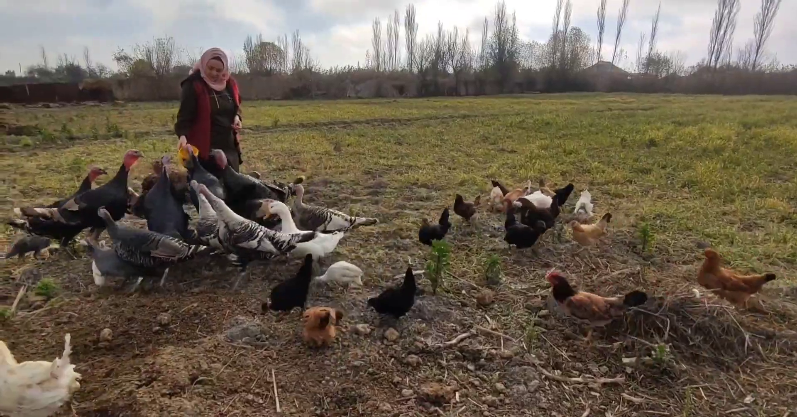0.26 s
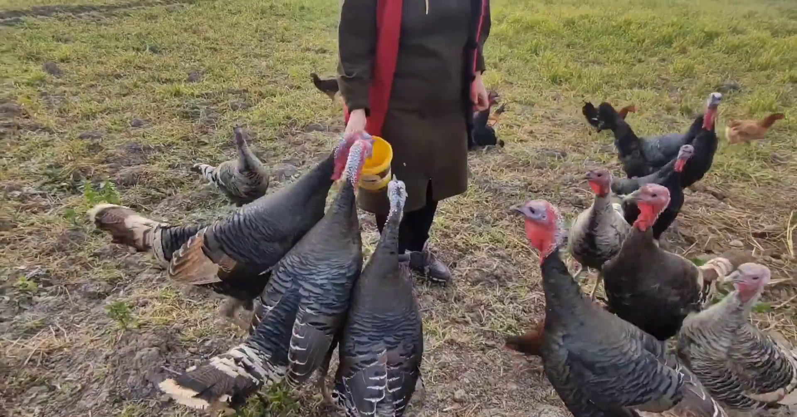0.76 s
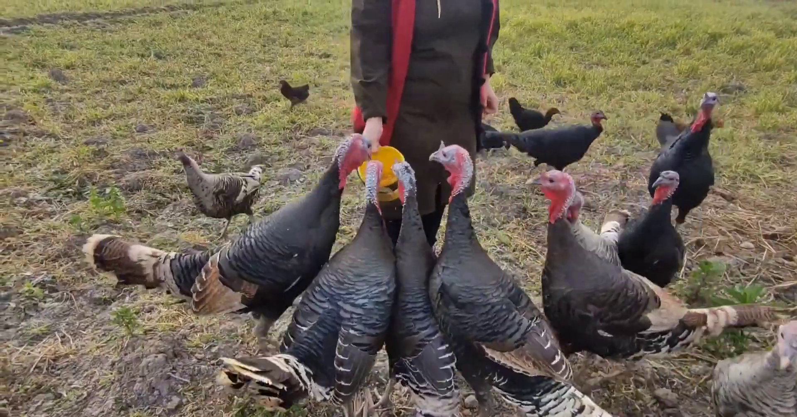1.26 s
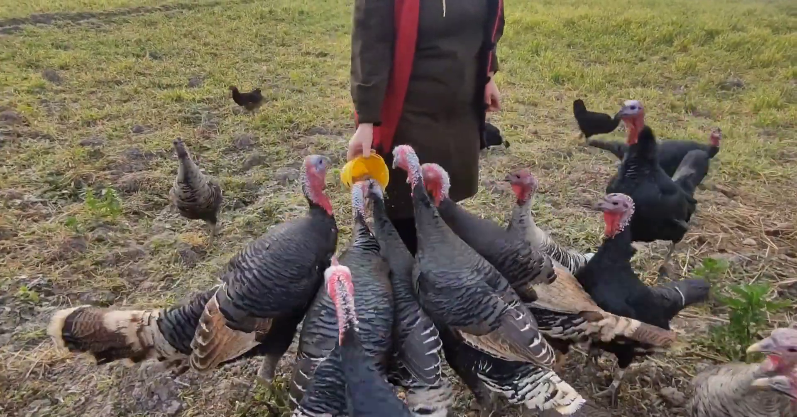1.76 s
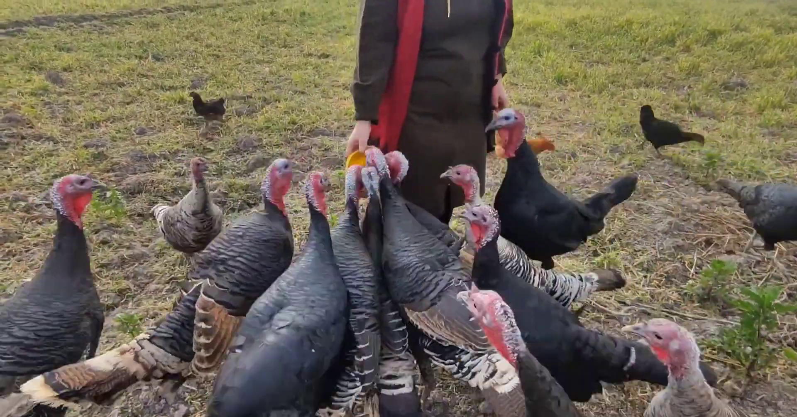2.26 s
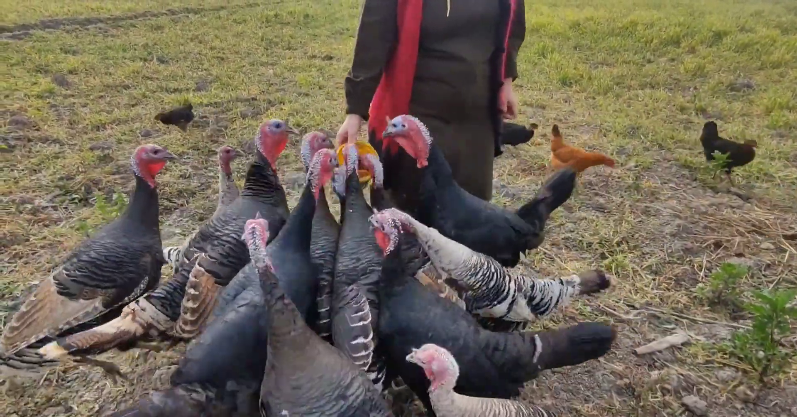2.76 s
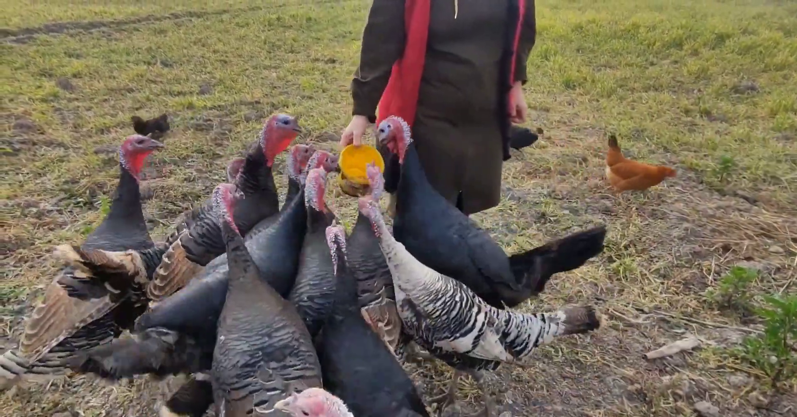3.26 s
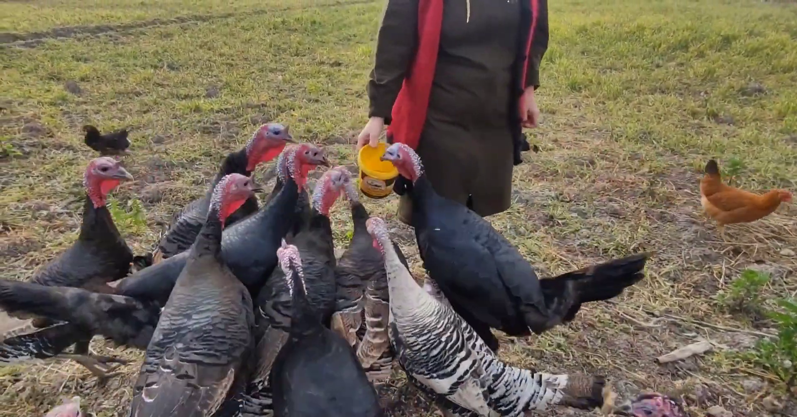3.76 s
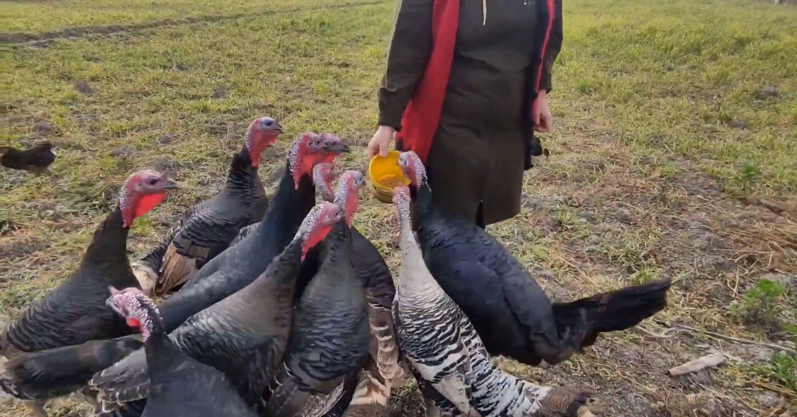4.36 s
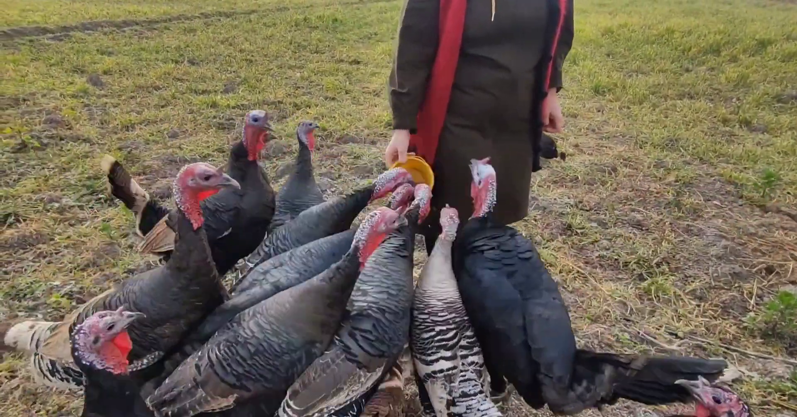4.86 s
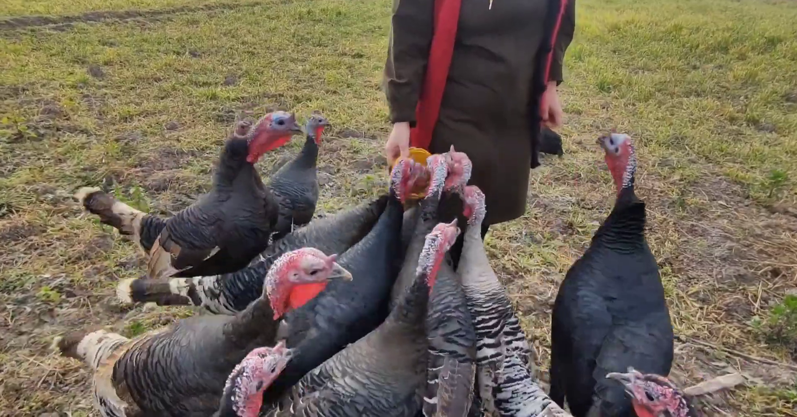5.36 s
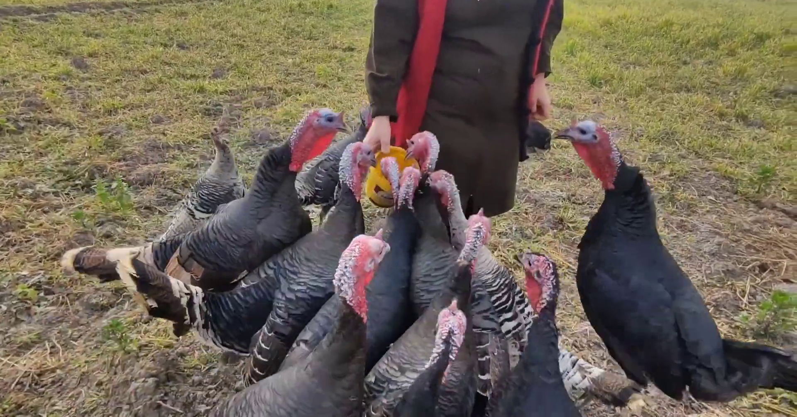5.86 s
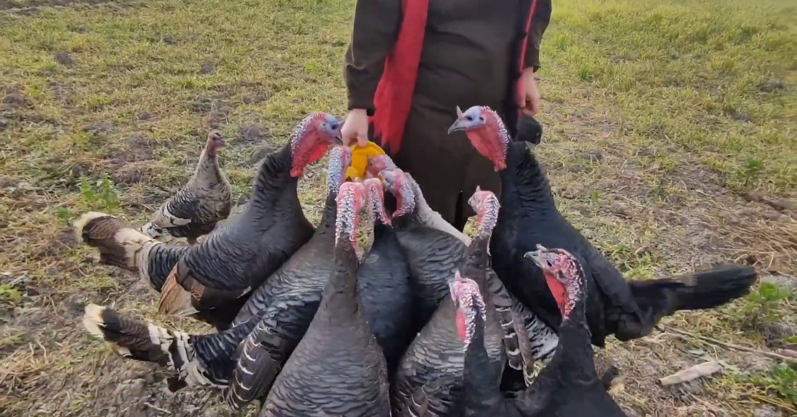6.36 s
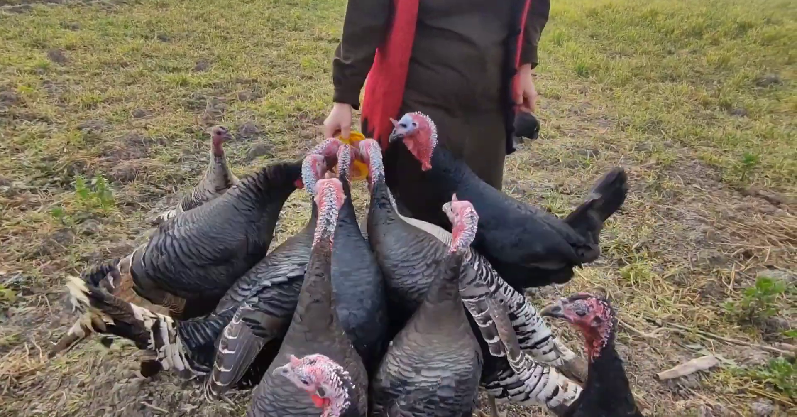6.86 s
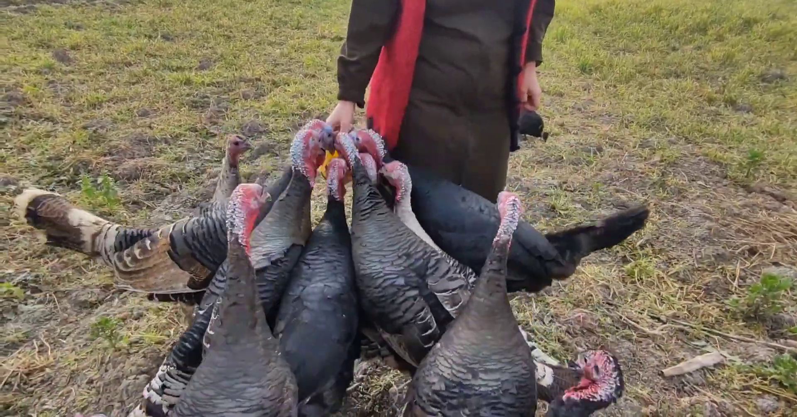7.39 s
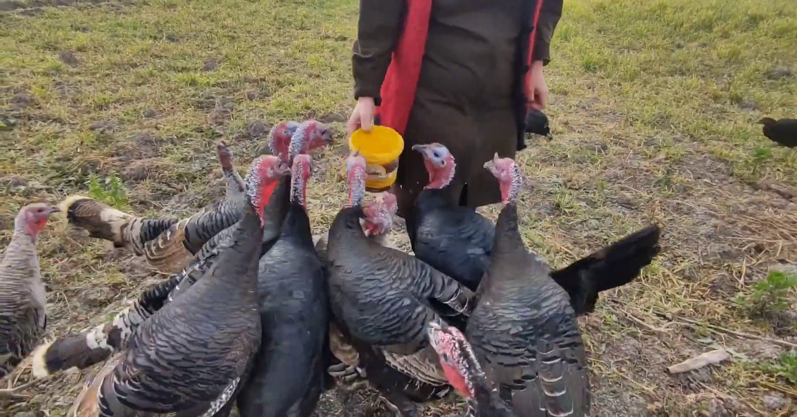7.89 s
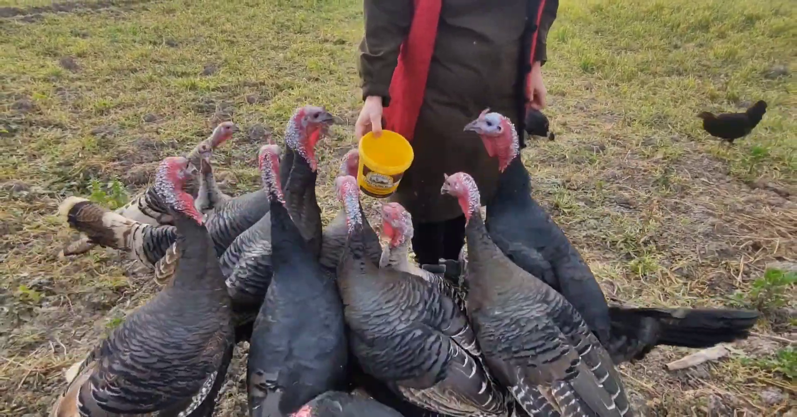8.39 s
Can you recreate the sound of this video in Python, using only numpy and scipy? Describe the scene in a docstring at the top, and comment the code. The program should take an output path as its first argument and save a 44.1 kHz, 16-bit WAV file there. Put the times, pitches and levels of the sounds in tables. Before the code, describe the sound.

A crowd of turkeys gobbles, whines and cries close by while dry straw rustles and small ticks snap on an open field.

```python
"""Young turkeys round a feed tub

A flock crowds round a tub on a stubble field, close to the microphone. The birds call over one another:
gliding tones with throat-shaped overtones make long whines, quick gobbling yelps, honks, cries and pips;
pulses and gated noise ringing a throat make harsh clucks. Coloured noise and tiny cracks are dry straw,
low noise bursts are feet, short ringing ticks are beaks and stalks. Behind lie a light breeze and a drone."""
import sys
import numpy as np
from scipy import signal
from scipy.fft import rfft, irfft, next_fast_len
from scipy.io import wavfile
from scipy.ndimage import uniform_filter1d, map_coordinates

SR = 44100
rng = np.random.default_rng(int(sys.argv[2]) if len(sys.argv) > 2 else 0)


def dump(signal):
    """Clip the signal to [-1, 1] and save it as 16-bit WAV at the path in sys.argv[1]."""
    limited = np.clip(np.atleast_2d(signal).T, -1, 1)
    pcm = np.round(limited * 32767).astype(np.int16)
    wavfile.write(sys.argv[1], SR, pcm)


N = 380583

# Glides of a yelp and of a cry, at even steps from start to end: (pitch over the call's own pitch [ratio])
YELP_GLIDE = [0.96, .93, .94, 1.0, 1.12, 1.333]
CRY_GLIDE = [0.63, .94, 0.97, .92, .82, .74, .67, .5]
FAR_HZ = 1223  # middle pitch of the birds further back


def amp(db):
    """Decibels to a linear gain."""
    return 10 ** (np.asarray(db) / 20)


def unit(x):
    """x at rms 1."""
    return x / np.sqrt(np.mean(x ** 2) + 1e-20)


def along(points, hz):
    """Read a curve of (frequency [Hz], value) points on a log frequency axis."""
    f, v = np.transpose(points)
    return np.interp(np.log(hz + 1), np.log(f), v)


def wobble(rate, size):
    """A smooth random curve over size samples, with rate knots a second."""
    knots = rng.standard_normal(int(size * rate / SR) + 4)
    return map_coordinates(knots, [1 + np.arange(size) * rate / SR])


def filtered(x, response):
    """x times a response of frequency."""
    n = x.shape[-1]
    m = next_fast_len(n + 4096)
    return irfft(rfft(x, m) * response(np.fft.rfftfreq(m, 1 / SR)), m)[..., :n]


def coloured(x, spectrum):
    """x given a spectrum, at rms 1."""
    return unit(filtered(x, lambda hz: amp(along(spectrum, hz))))


def diffuse(pair, spectrum):
    """Two unrelated signals as a stereo pair with a spectrum, at rms 1."""
    # Diffuse sound differs between the ears as it rises in pitch: (frequency [Hz], side level [dB])
    width = [(120, -27), (700, 0), (3000, -0.5)]
    side = filtered(pair[1], lambda hz: amp(along(width, hz)))
    return coloured(pair[0] + np.array([side, -side]), spectrum)


def add(track, s, sound):
    """Mix a sound in at time s."""
    part = track[:, max(round(s * SR), 0):][:, :sound.shape[-1]]
    part += sound[..., :part.shape[-1]]


def swell(n, place, bend):
    """A rounded rise and fall over n samples, loudest at place (0-1)."""
    arc = np.interp(np.linspace(0, 1, n), [0, place, 1], [0, .5, 1])
    return np.abs(np.sin(np.pi * arc)) ** bend


def near_birds(flock_db=-18):
    """The near birds call; others further back join in at their own moments and pitches."""
    # Where the callers stand: (time [s], left ear's lead [ms])
    places = [(.55, -0.38), (1.04, 0.38), (1.4, 0.31), (1.87, -0.23), (2, .24), (2.15, 0.13), (2.95, -.15),
              (3.75, -0.26), (4.45, 0.028), (5.1, -0.075), (5.7, 0.15), (6.85, -0.0097), (7.2, -0.18),
              (8.4, -0.13)]
    out = np.zeros((2, N))
    times, leads = np.transpose(places)
    for s, length, pitch, db, overtone_db in calls():
        add(out, s, note(length, pitch, db, overtone_db, np.interp(s, times, leads)))
        # seconds, octaves and milliseconds
        late, higher, lead_ms = rng.uniform(-1, 1, 3) * [.035, .6, .4]
        far_pitch = FAR_HZ * 2 ** higher * pitch / pitch.mean()
        add(out, s + late, note(length, far_pitch, flock_db + db, overtone_db, lead_ms))
    return out


def calls():
    """Every note of the near birds: (time [s], length [s], glide [Hz], level [dB], overtone level [dB])."""
    # Overtone levels are relative to the fundamental, before the throat shapes them.
    # Yelps, mostly in the quick runs of a gobble:
    # (time [s], length [s], pitch [Hz], level [dB], overtone level [dB])
    yelp_table = [(0.473, 0.029, 1054, -24.5, 3), (0.53, 0.026, 1050, -24, 1),
                  (1.035, 0.035, 1068, -24, -1), (1.524, 0.034, 944, -11.5, -1),
                  (1.582, 0.032, 954, -15.0, -1), (2, 0.032, 1107, -12.5, -12),
                  (2.055, 0.03, 1010, -12, -6), (2.104, 0.029, 1028, -12.5, -15),
                  (2.154, 0.025, 1180, -15, -17), (2.903, 0.039, 1042, -20, -8),
                  (2.962, 0.032, 1128, -12.5, -2), (3.017, 0.027, 1104, -15.5, -4.0),
                  (3.059, 0.025, 1160, -16.0, -7.0), (3.667, 0.028, 987, -21, 0),
                  (3.728, 0.021, 1040, -19.5, -3.5), (3.772, 0.031, 1076, -16, 4),
                  (3.985, 0.025, 1072, -14.5, -14), (4.033, 0.029, 1037, -16.5, -18),
                  (5.097, 0.03, 1016, -13.5, -2.5), (5.15, 0.028, 1066, -15, 0),
                  (5.818, 0.04, 1276, -20, -0.5), (6.346, 0.04, 1073, -11.5, -6.5),
                  (6.403, 0.04, 1068, -11.5, -2), (6.47, 0.026, 1087, -11.5, -4.5),
                  (8.4, 0.027, 1050, -14, -8), (8.461, 0.023, 1055, -16.5, -4)]
    # Honks in the low register: (time [s], length [s], pitch [Hz], level [dB], overtone level [dB])
    honk_table = [(0.702, .046, 750, -27.5, -2.5), (1.642, 0.018, 775, -17, -5),
                  (4.094, 0.037, 689, -29, -2), (4.358, 0.019, 772, -25, 6.5),
                  (4.419, 0.021, 750, -22, 5.5), (4.474, 0.0272, 735, -20, 3.5),
                  (8.098, 0.018, 738, -32, -5)]
    # Held whines, which often lead into a gobble:
    # (time [s], length [s], pitch [Hz], level [dB], overtone level [dB])
    whine_table = [(0.34, 0.13, 985, -34.5, -14), (0.336, 0.11, 663, -38.5, -5),
                   (0.754, 0.095, 717, -37, -6), (1.312, 0.047, 1027, -20.5, -6),
                   (1.365, 0.043, 1064, -14.5, -10), (1.45, 0.048, 1174, -11, -14),
                   (1.61, 0.041, 758, -25.5, -1.5), (1.801, 0.13, 918, -26, 7), (1.82, 0.15, 671, -30, -3),
                   (1.92, 0.097, 1040, -28, -0.5), (2.773, 0.11, 756, -24.5, -2.5),
                   (2.811, 0.037, 1325, -15.5, -4), (2.943, 0.031, 771, -27, -6),
                   (3.429, 0.18, 954, -25.5, -19), (3.625, 0.048, 1058, -24, 2),
                   (3.812, 0.055, 724, -23, -9.5), (3.86, 0.059, 977, -23, -9),
                   (3.93, 0.043, 1065, -17.5, -5), (4.222, 0.097, 1092, -23.5, -6),
                   (4.298, 0.059, 1640, -30.5, -20), (4.813, .16, 920, -23.5, -10.5),
                   (4.859, 0.064, 1453, -25, -2), (5, 0.068, 995, -15.5, -1.5),
                   (5.635, 0.11, 1089, -27, -10), (6.138, .19, 964, -18.5, -4.5),
                   (7.014, 0.082, 668, -26, -4), (8.117, 0.17, 972, -26, -11),
                   (8.305, 0.07, 1040, -15, -12), (8.552, 0.084, 1417, -38, 4.5)]
    # Cries that leap up and sink:
    # (time [s], length [s], pitch [Hz], glide depth [1 = usual], level [dB], overtone level [dB])
    cry_table = [(0.099, 0.12, 2200, 0.8, -42, 6), (0.201, 0.14, 1760, 0.4, -34.5, -11),
                 (0.268, 0.1, 1205, 1.06, -35.5, -19), (1.418, 0.051, 1748, 0.42, -18, -15),
                 (1.656, 0.083, 1620, 1, -23, -20), (1.768, 0.06, 2010, 0.7, -16.5, -8),
                 (1.8, 0.059, 2800, 0.65, -21.5, -24), (1.819, 0.12, 1750, 0.71, -24, -12),
                 (1.954, 0.099, 1830, 0.95, -24, -5), (2.083, 0.13, 2010, 1.31, -24, -14),
                 (2.655, .06, 1250, 1.1, -35, 0), (2.955, 0.093, 3680, 0.72, -24, -24),
                 (3.912, 0.024, 1933, .5, -25, -11), (4.497, 0.0157, 1620, 0.83, -22.5, -8),
                 (4.972, 0.072, 750, 0.33, -27.5, -5.5), (5.161, 0.056, 997, 0.94, -25, -3.5),
                 (5.275, .14, 1400, 0.95, -26, -16), (5.291, 0.082, 1606, 0.21, -31, 8),
                 (6.087, 0.12, 2053, 1.55, -28, -22), (6.199, 0.077, 1583, 0.41, -31, -14),
                 (6.326, 0.04, 1860, 0.79, -25.5, -18), (6.465, 0.1, 2140, 1.78, -22.5, -21),
                 (6.595, 0.17, 1096, 0.79, -28.5, -9), (6.74, 0.029, 1547, 0.36, -22, -26),
                 (6.849, 0.11, 1187, 0.33, -24, -7), (6.959, 0.092, 1210, 0.32, -26, -9),
                 (7.004, 0.13, 1606, 1, -23.5, -11), (7.167, 0.1, 1393, 2.13, -24.5, -23),
                 (7.225, 0.031, 1525, 0.34, -19.5, -18), (7.294, 0.03, 1540, 0.8, -25.5, -10),
                 (8.195, 0.097, 750, 0.61, -33, -2.5)]
    # Lone upward pips: (time [s], length [s], pitch [Hz], level [dB])
    pip_table = [(0.461, 0.0094, 1354, -19.5), (1.612, .016, 1353, -18.5), (2.079, 0.021, 1150, -19),
                 (2.606, 0.04, 864, -31), (3.196, 0.016, 1584, -19.5), (3.871, 0.023, 1750, -24.5),
                 (4.442, 0.017, 1200, -24), (5.884, 0.027, 1148, -21), (6.067, 0.02, 1030, -24.5),
                 (6.307, 0.024, 1262, -20.5), (6.531, 0.034, 960, -20), (7.704, 0.025, 1047, -35.5),
                 (7.908, 0.029, 1090, -33.5)]
    # Glides of a honk and of a pip, at even steps: (pitch over the call's own pitch [ratio])
    honk_glide = np.array([1.037, .98, .99, 1.08])
    pip_glide = np.array([.7, 0.85, 1.1, 1.5])
    yelp_glide, cry_glide = np.array(YELP_GLIDE), np.array(CRY_GLIDE)
    usual_yelp_s = 0.0288  # longer yelps glide less
    pip_overtone_db = -19  # pips are nearly pure

    yelps = [(s, length, hz * yelp_glide ** (usual_yelp_s / length), db, over)
             for s, length, hz, db, over in yelp_table]
    honks = [(s, length, hz * honk_glide, db, over) for s, length, hz, db, over in honk_table]
    whines = [(s, length, hz * whine_glide(length), db, over) for s, length, hz, db, over in whine_table]
    cries = [(s, length, hz * cry_glide ** depth, db, over) for s, length, hz, depth, db, over in cry_table]
    pips = [(s, length, hz * pip_glide, db, pip_overtone_db) for s, length, hz, db in pip_table]
    return [*yelps, *honks, *whines, *cries, *pips]


def whine_glide(length):
    """A whine sags and flicks up at its end; a long one first scoops up from the low register."""
    sag, flick, scoop_depth = 0.1206, 0.347, .35  # shares of the pitch
    flick_s, scoop_s, long_whine_s = 0.0083, .024, .083
    t = np.linspace(0, length, 60)
    scoop = scoop_depth * (length > long_whine_s) * np.clip(1 - (t / scoop_s) ** 2, 0, 1)
    return 1 - scoop + sag * (.5 - t / length) + flick * np.exp((t - length) / flick_s)


def note(length, pitch, db, overtone_db, lead_ms, rasp_db=-25.5, fall_db=4.5, drive=0.31, hiss_db=-26,
         flutter_db=3):
    """A nearly pure tone glides through its pitches; the throat shapes its overtones, air hisses past."""
    # What the throat leaves of the overtones: (frequency [Hz], gain [dB])
    throat = [(1550, -2), (2000, -15.5), (2400, -16), (2700, -21.5), (3100, -18.5), (3500, -20), (4000, -5),
              (4700, -37.5)]
    # Colour of the breath: (frequency [Hz], relative level [dB per Hz])
    hiss = [(400, -31), (1000, 15), (1700, 16), (2700, -15), (4100, -6), (5500, -34)]
    jitter, shimmer_db = .01, 1.5  # unsteadiness of pitch (share) and of level
    full_voice_db = -19.5  # calls whose level plus overtone falls below this are darker
    rough_from_hz = 1250  # higher calls grow hoarse
    swell_lean = 0.41  # how far a rising pitch pushes the loudest moment towards the end

    n = round(length * SR)
    glide = map_coordinates(pitch, [np.linspace(0, len(pitch) - 1, n)], mode="nearest")
    hz = glide * (1 + jitter * wobble(350, n))
    # each ear hears the tone half the lead early or late
    ear_shift = hz * np.array([[.5], [-.5]]) * lead_ms / 1000
    phase = 2 * np.pi * (np.cumsum(hz) / SR + ear_shift)
    tone = np.sin(phase)

    # only a loud call drives the upper overtones; uneven cycles blur the higher ones most
    slip = .14 * wobble(700, n)
    step_db = fall_db + drive * max(full_voice_db - db - overtone_db, 0)
    for k in range(2, 7):
        level_db = overtone_db + along(throat, k * hz) - step_db * (k - 2.5) + flutter_db * wobble(47.5, n)
        tone += amp(level_db) * np.sin(k * (phase + slip))

    # uneven cycles scatter sidebands round the tone,
    # most in shrill calls and where the pitch leaves its middle value
    strain = 1 + np.minimum(10 * np.abs(np.log(np.abs(hz) / np.median(glide))), 2)
    strain *= np.maximum(glide / rough_from_hz, 1)
    tone *= 1 + amp(rasp_db) * strain * wobble(1200, n)
    tone += amp(rasp_db) * strain * wobble(1200, n) * np.cos(phase)
    tone += amp(hiss_db) * diffuse(rng.standard_normal((2, n)), hiss)

    # rising notes swell late, falling ones early; long notes hold their level
    place = np.clip(.53 + swell_lean * np.log(pitch[-1] / pitch[0]), .2, .75)
    envelope = swell(n, place, min(1, np.sqrt(.025 / length)))
    return tone * envelope * amp(db + shimmer_db * wobble(200, n))


def clucks():
    """The syrinx drops to slow, hard pulses that ring the throat; rough ones turn to gated noise."""
    # Harsh clucks and barks: (time [s], length [s], pulse rate [Hz], level [dB], roughness [0-1])
    cluck_table = [(0.461, 0.0044, 410, -26, 0.9), (1.088, 0.058, 411, -35, 0.83),
                   (1.177, 0.023, 204, -23, 0.09), (1.605, 0.13, 272.6, -31.5, 0.87),
                   (1.963, 0.11, 300.5, -31.5, 0.7), (1.61, 0.018, 383, -26, 0.8),
                   (1.759, 0.026, 694, -26, 0.54), (1.676, 0.068, 597, -31.5, 0.26),
                   (2.713, 0.039, 297.4, -32, 0.01), (2.811, 0.035, 224.4, -21, 1),
                   (2.955, 0.035, 184.5, -24.5, 1.01), (1.831, 0.12, 301, -34, .8),
                   (5.272, 0.0083, 387, -23, 0.5), (6.447, 0.041, 331, -27.5, 1.06),
                   (6.838, 0.012, 813, -21.5, 0.44), (7, 0.011, 400, -19.5, 0.73),
                   (8.315, 0.0067, 783, -26, 0.07)]
    out = np.zeros((2, N))
    for s, length, hz, db, rough in cluck_table:
        n = round(length * SR)
        cycle = np.arange(n) * hz / SR + .5
        pulses = unit(np.diff(np.floor(cycle), prepend=0))
        air = unit(rng.standard_normal(n) * (1 - cycle % 1) ** 2)
        share = np.clip(rough, 0, 1)
        source = (np.sqrt(1 - share) * pulses + np.sqrt(share) * air) * swell(n, 0.46, 0.62)
        ringing_on = np.pad(source, (0, SR // 20))
        # a strained bark loses the low neck resonance
        voice = filtered(ringing_on, lambda f: cluck_throat(f) * f ** 2 / (f ** 2 + (1500 * share) ** 2 + 1))
        add(out, s, amp(db) * voice / np.std(voice[:n]))
    return out


def cluck_throat(f):
    """The resonances of neck and open beak, summed with alternating sign."""
    # Throat resonances: (centre [Hz], width [Hz], relative level [dB])
    modes = [(209, 61, 13), (755, 131, 16), (1327, 114, 17), (1696, 40, 8), (3360, 81, -31)]
    return sum((-1) ** k * amp(db) * 1j * f * w / (c * c - f * f + 1j * f * w)
               for k, (c, w, db) in enumerate(modes))


def far_birds(overtone_db=-6):
    """Faint yelps and cries at random from the edge of the flock, as short quiet notes."""
    calls_per_s, level_db, length_s = 4.8, -38, 0.056
    out, glides = np.zeros((2, N)), [YELP_GLIDE, CRY_GLIDE]
    draws = rng.random((round(calls_per_s * N / SR), 4))
    for k, (when, longer, higher, side) in enumerate(draws):
        pitch = FAR_HZ * 2 ** (higher - .5) * np.array(glides[k % len(glides)])
        call = note(length_s * (.5 + longer), pitch, level_db, overtone_db, side - .5)
        add(out, when * N / SR, call)
    return out


def scatter(x, t60=0.057):
    """Ground and bodies throw back a brief diffuse echo: decaying noise convolved with the sound."""
    t = np.arange(SR // 4) / SR
    tail = rng.standard_normal((2, len(t))) * amp(-60 * t / t60) * (t > .003)
    return signal.fftconvolve(x, tail / np.linalg.norm(tail[0]), axes=1)[:, :N]


def straw(hiss_db=6, scrape_db=2.5, grain_db=3, clump_db=2.5, scrape_clump_db=2, crackle=0.13,
          patchy_db=3.0, stalk_db=-11):
    """Dry stalks and feathers rub: a hiss with many tiny cracks and coarser snaps, in clumps."""
    # Colour of the rubbing: (frequency [Hz], relative level [dB per Hz])
    rub_colour = [(120, -12), (300, 8), (420, 2.5), (580, 13.5), (900, 1), (1600, 12), (2500, 5.5),
                  (4300, 8), (6800, -8.5), (8700, 6.5), (10000, 1), (12500, 10), (15500, -13.5)]
    # The coarse scrape gives way to the fine hiss: (frequency [Hz], scrape share [0-1])
    scrape_share = [(6000, 0.91), (8000, 0.19)]
    moments = rng.random((2, N)) < 800 / SR  # 800 cracks a second in each signal
    sizes = rng.standard_normal((2, N)) * amp(grain_db * rng.standard_normal((2, N)))
    cracks = unit(moments * sizes)
    rub = patchy(diffuse(crackle * cracks + rng.standard_normal((2, N)) / 2, rub_colour), patchy_db)
    # the right microphone port is duller in the top octave
    rub[1] = filtered(rub[1], lambda hz: amp(along([(9500, -0.63), (12500, -9.5)], hz)))
    low = filtered(rub, lambda hz: along(scrape_share, hz))
    scrape = low + amp(stalk_db) * stalks()
    fine, coarse = effort()
    hiss_layer = amp(hiss_db) * fine * (rub - low)
    scrape_layer = amp(scrape_db + scrape_clump_db * wobble(40, N)) * coarse * scrape
    return (hiss_layer + scrape_layer) * amp(clump_db * wobble(55, N))


def patchy(x, depth_db):
    """Each stalk and feather has its own colour: brief patches of the spectrum stand out."""
    z = signal.stft(x, nperseg=256)[2]
    field = uniform_filter1d(rng.standard_normal(z.shape[1:]), size=6, axis=0)  # across frequency
    field = uniform_filter1d(field, size=14, axis=1)  # across time
    return unit(signal.istft(z * amp(depth_db * unit(field)), nperseg=256)[1][:, :N])


def stalks(per_s=420, ring_hz=3200, spread=.45, t60=.007, size_db=2.5):
    """Single stalks snap at random, each with a short ring of its own pitch."""
    out, t = np.zeros((2, N)), np.arange(SR // 60) / SR
    for when, higher, size, side in rng.random((round(per_s * N / SR), 4)):
        hz = ring_hz * np.exp(spread * (2 * higher - 1))
        left_shift = side * np.array([[np.pi], [0]])
        ring = np.sin(2 * np.pi * hz * t + left_shift) * amp(-60 * t / t60)
        add(out, when * N / SR, ring * amp(-size_db * np.log(size + .02)))
    return unit(out)


def effort(shuffle_db=2, scuff_db=1.0):
    """Gains of hiss and scrape: each scuff rises fast, holds and dies away over the shuffling."""
    # Feet and wings sweep the straw:
    # (time [s], length [s], relative fine hiss level [dB], relative coarse scrape level [dB])
    scuffs = [(0.033, 0.13, -61, -44.5), (0.716, 0.05, -46.5, -38), (0.997, 0.015, -41, -32.5),
              (1.057, 0.096, -46.5, -40), (1.503, 0.078, -48, -33), (2.043, 0.077, -40.5, -34),
              (2.261, 0.14, -47, -43), (2.945, 0.28, -47.5, -42), (3.454, 0.15, -45, -40),
              (4.226, 0.2, -47, -37.5), (4.893, 0.069, -45, -36), (5.012, 0.16, -63, -36),
              (5.61, 0.071, -37.5, -32), (5.777, 0.18, -50, -36), (6.139, 0.049, -40.5, -34),
              (7.091, 0.081, -46, -36), (7.772, 0.11, -44, -37.5), (7.91, 0.13, -45.5, -42)]
    # Shuffling underneath: (time [s], relative fine hiss level [dB], relative coarse scrape level [dB])
    shuffle = [(0.0, -56, -49.5), (1.3, -57.5, -48.5), (1.97, -48, -41), (2.79, -54, -46.5),
               (3.05, -54.5, -46), (4.85, -58, -57), (5.86, -50, -45.5), (6.47, -55.5, -47),
               (7.91, -52, -46.5), (8.12, -54.5, -66), (8.63, -59, -62)]
    attack_s, release_s = 0.019, 0.04
    t = np.arange(N) / SR
    times, *levels = np.transpose(shuffle)
    power = amp([shuffle_db + np.interp(t, times, level) for level in levels]) ** 2
    for s, length, *db in scuffs:
        rise = np.clip((t - s) / attack_s + .5, 0, 1)
        shape = rise * np.exp(-np.maximum(t - s - length, 0) / release_s)
        power = power + np.outer(amp(scuff_db + np.array(db)), shape) ** 2
    return np.sqrt(power)


def knocks(thud_db=-5, thud_t60=0.11, peck_db=-3, peck_t60=0.023, peck_rise_s=0.0018, ring_db=11,
           ring_width_hz=260):
    """Feet push dully on the soil; beaks and stalks give short dry ticks, each with its own ring."""
    # Footfalls: (time [s], relative level [dB])
    thuds = [(0.574, -38), (2.077, -32), (2.253, -32.5), (2.981, -30), (3.156, -31), (4.255, -29.5),
             (6.904, -28.5), (7.417, -33), (7.667, -33.5), (7.766, -33), (7.868, -28)]
    # Beak ticks and snapping stalks: (time [s], relative level [dB], ring [Hz])
    pecks = [(0.5758, -15.5, 3120), (0.5822, -15.5, 2500), (0.728, -17, 3800), (0.8133, -9.5, 4600),
             (1.001, -19, 2700), (4.249, -8, 3660), (4.556, -23.5, 4380), (5.0805, -18, 3150),
             (5.516, -20.5, 4600), (5.6208, -10.5, 3300), (6.0552, -22, 3520), (6.1502, -14.5, 4000),
             (7.421, -19, 2470), (8.0045, -13, 1400)]
    # Colour of a tick before its ring: (frequency [Hz], relative level [dB per Hz])
    peck_colour = [(150, -22), (560, 15.5), (1600, 2.5), (3300, 6.5), (4800, 3), (12500, 4.5), (15500, -2)]
    thud_colour = [(70, -18), (200, 7.0), (420, 9.0), (1200, -41), (6000, -28)]
    out, t = np.zeros((2, N)), np.arange(SR // 8) / SR
    for s, db in thuds:
        push = coloured(rng.standard_normal(len(t)), thud_colour)
        add(out, s, amp(db + thud_db) * push * amp(-60 * np.abs(t - .009) / thud_t60))
    for s, db, hz in pecks:
        tick = amp(db + peck_db - 60 * t / peck_t60) * (1 - np.exp(-t / peck_rise_s))
        crack = diffuse(rng.standard_normal((2, len(t))), peck_colour)
        ringing = filtered(crack, lambda f: 1 + amp(ring_db) / (1 + 1j * (f - hz) / ring_width_hz))
        add(out, s, tick * unit(ringing))
    return out


def outdoors(drone_db=-3):
    """A light breeze over the field and a low drone far off, both as diffuse coloured noise."""
    # Breeze: (time [s], level [dB])
    breeze = [(0, -55), (1.4, -46.5), (4.3, -45), (4.7, -47.5), (8.6, -51.5)]
    # Colour of the outdoor air: (frequency [Hz], relative level [dB per Hz])
    air_colour = [(20, -55), (72, -6), (200, -5.5), (1000, -10.5), (15000, -51)]
    # Drone: (time [s], relative level [dB])
    drone = [(0.9, -76), (3, -55.5), (4.47, -54), (4.54, -75)]
    # Colour of the drone: (frequency [Hz], relative level [dB per Hz])
    drone_colour = [(45, -21), (72, 4), (105, -19), (250, -57)]

    def layer(levels, spectrum):
        gain = amp(np.interp(np.arange(N) / SR, *np.transpose(levels)))
        return gain * diffuse(rng.standard_normal((2, N)), spectrum)

    return layer(breeze, air_colour) + amp(drone_db) * layer(drone, drone_colour)


def scene():
    """The flock with its brief echo, the straw underfoot and the open air."""
    ground = straw() + knocks() + outdoors()
    birds = clucks() + near_birds() + far_birds()
    return birds + amp(-8) * scatter(birds) + ground


def record(dry):
    """The recorder keeps nothing above its band limit."""
    top_hz = 15800
    return filtered(dry, lambda hz: hz < top_hz)


dry = scene()
out = record(dry)
dump(out)
```